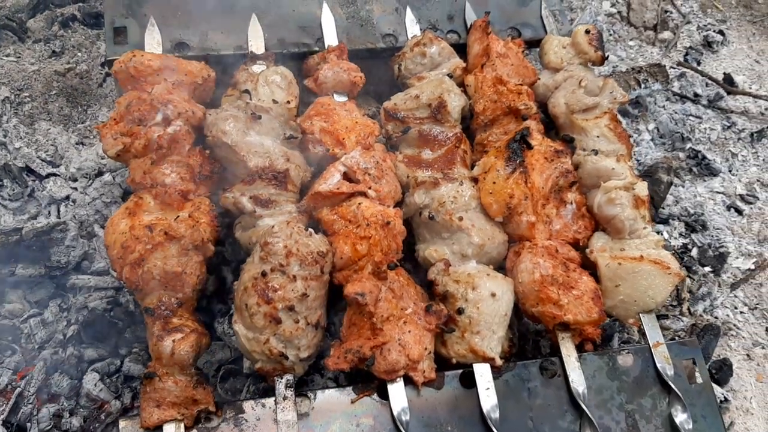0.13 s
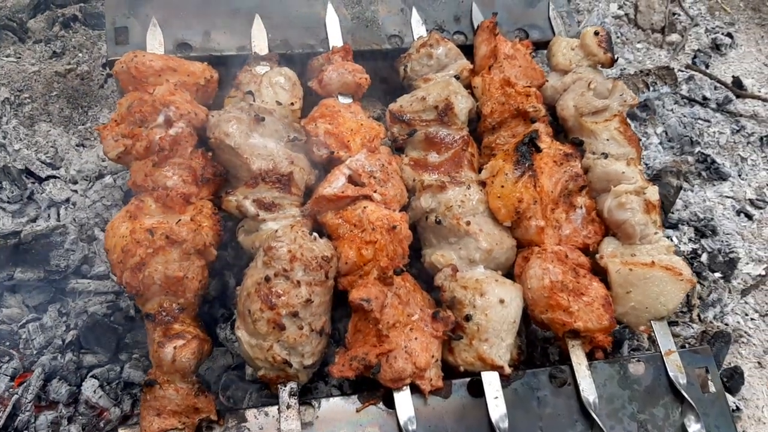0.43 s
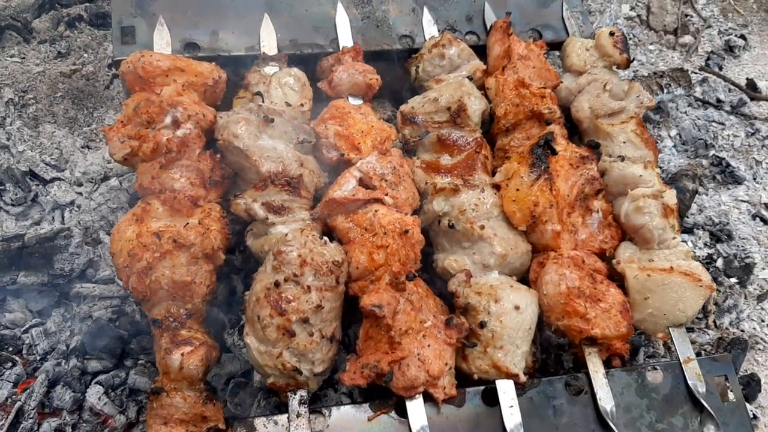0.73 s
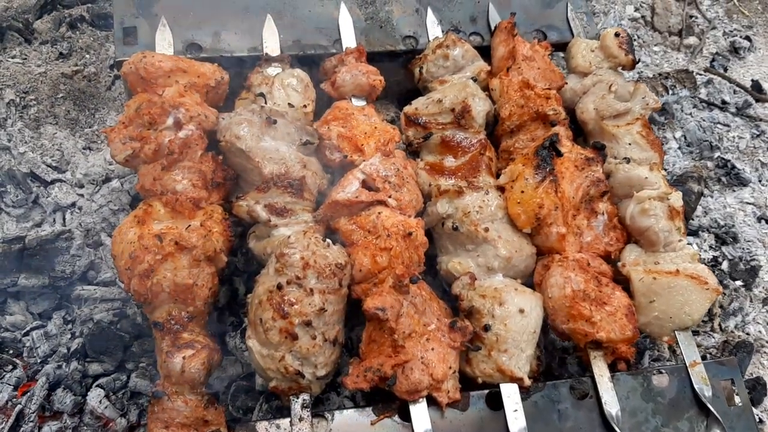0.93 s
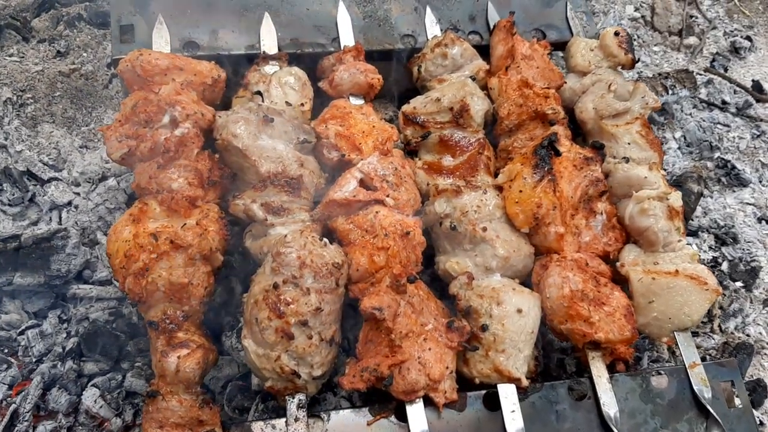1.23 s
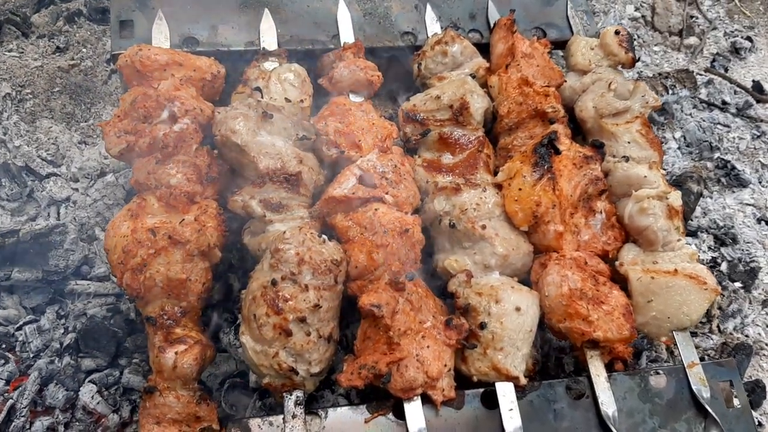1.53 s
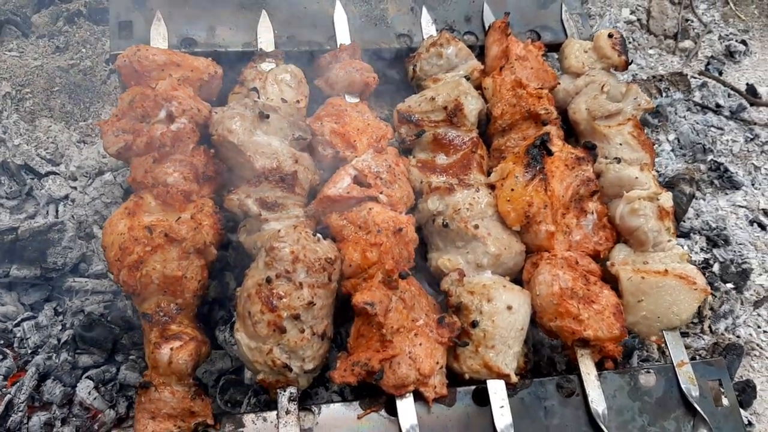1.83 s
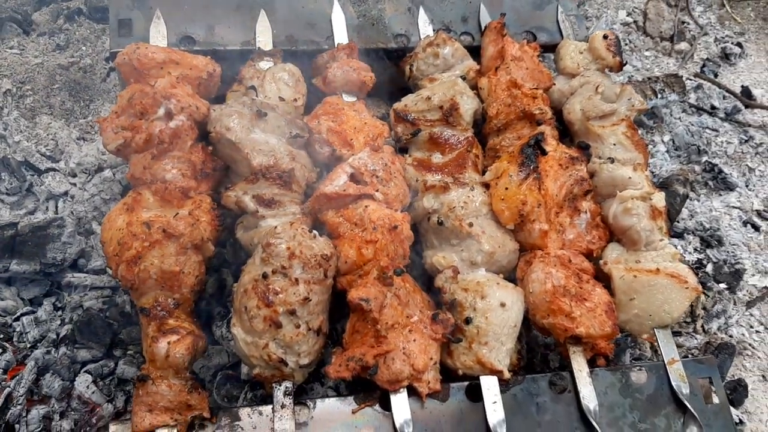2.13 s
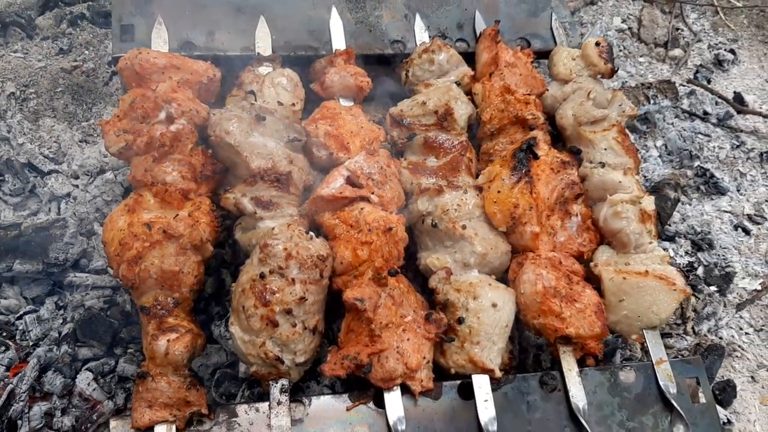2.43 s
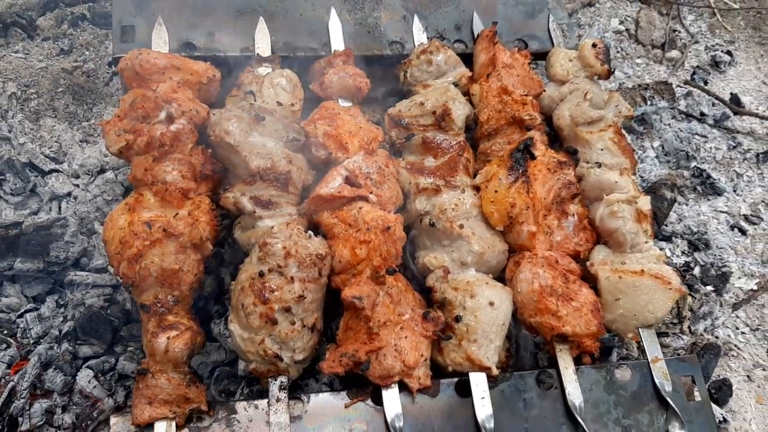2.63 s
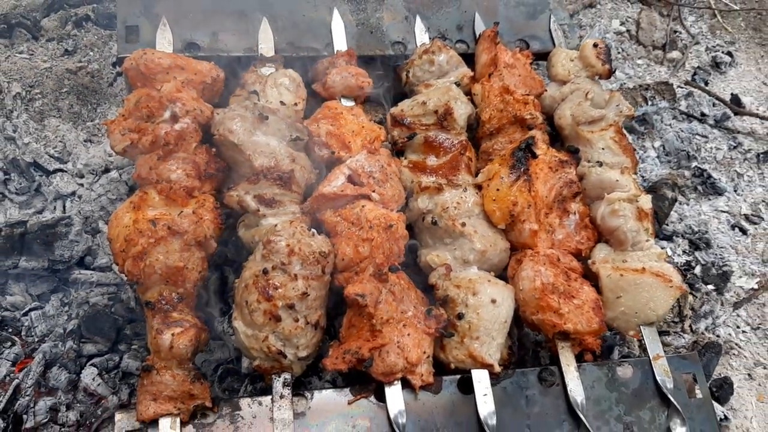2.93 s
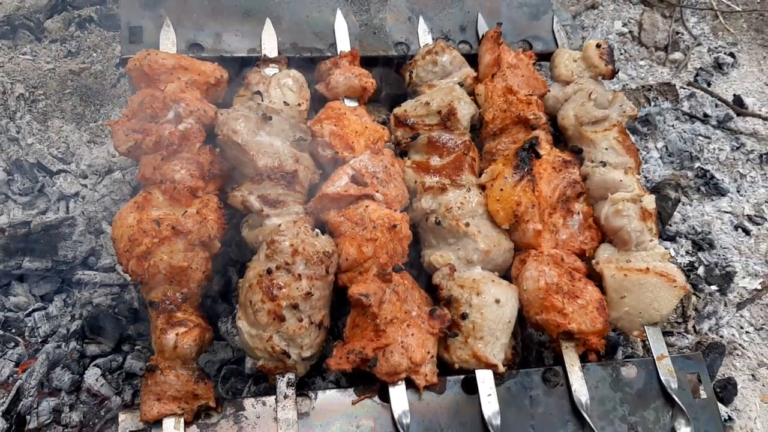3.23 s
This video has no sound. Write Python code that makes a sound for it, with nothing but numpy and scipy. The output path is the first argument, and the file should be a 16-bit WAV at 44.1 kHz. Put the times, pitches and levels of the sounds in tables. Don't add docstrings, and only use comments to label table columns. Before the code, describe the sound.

Crisp, treble-heavy sizzling of meat over coals, heard close outdoors in stereo. It starts softer, turns busy with snapping fat, eases, then surges past two seconds with dripping hisses, a deeper coal crack and scattered pops.

```python
import sys
import numpy as np
from scipy import signal
from scipy.fft import rfft, irfft
from scipy.io import wavfile
from scipy.ndimage import uniform_filter1d

SR = 44100
rng = np.random.default_rng(int(sys.argv[2]) if len(sys.argv) > 2 else 0)


def boost_factor(decibels):
    exponent = np.asarray(decibels, float) / 20
    return 10 ** exponent


def log_audio(samples):
    frames = np.atleast_2d(samples).T
    limited = np.clip(frames, -1, 1)
    pcm = np.round(limited * 32767).astype(np.int16)
    wavfile.write(sys.argv[1], SR, pcm)


N = 149499
SCATTER = .2
HUM_PAN_DB = 3.8


def evened(x):
    return x / np.sqrt(np.mean(x ** 2) + 1e-20)


def passed(x, order, hz, kind="low"):
    return signal.lfilter(*signal.butter(order, hz, kind, fs=SR), x)


def sides(pan_db):
    return boost_factor([[pan_db / 2], [-pan_db / 2]])


def colour(x, points, peaks=()):
    hz = np.abs(np.fft.fftfreq(4096, 1 / SR))
    f, value = np.transpose(points)
    db = np.interp(np.log(hz + 1), np.log(f + 1), value)
    for peak_hz, width_hz, peak_db in peaks:
        db = db + peak_db / (1 + (2 * (hz - peak_hz) / width_hz) ** 2)
    response = np.exp(np.conj(signal.hilbert(db * np.log(10) / 20)))
    taps = np.fft.ifft(response).real[:2048]
    return signal.oaconvolve(x, taps)[:N]


def ports(x, lag_ms, pan_db, echo_ms):
    bounce = boost_factor(-9)
    padded = N + 501
    z, hz = rfft(x, padded), np.fft.rfftfreq(padded, 1 / SR)
    turn = -2j * np.pi * hz / 1000
    left = np.exp(turn * lag_ms) * (1 + bounce * np.exp(turn * echo_ms))
    right = 1 + bounce * np.exp(turn * echo_ms * 1.7)
    return sides(pan_db) * irfft(z * np.array([left, right]), padded)[:, :N]


def scattered(spit, level, lag_ms, pan_db, echo_ms):
    direct = ports(spit, lag_ms, pan_db, echo_ms)
    stray = sides(pan_db) * rng.standard_normal((N, 2)).T * level
    return np.sqrt(1 - SCATTER) * direct + np.sqrt(SCATTER) * stray


def bursts(per_s, spread_db, fade_s, bed):
    size = boost_factor(spread_db * np.minimum(rng.exponential(1, N), 3.8))
    size = size * (rng.random(N) < per_s / SR)
    t = np.arange(800) / SR
    spurt = np.exp(-t / fade_s) * (1 - np.exp(-t / 0.00062))
    return evened(bed + evened(signal.oaconvolve(size, spurt)[:N]))


def crack(fade_s, draw, tick):
    t = np.arange(len(draw)) / SR
    puff = draw * np.exp(-t / fade_s) * (1 - np.exp(-t / .0002))
    return (t == 0) * tick + puff / np.linalg.norm(puff)


def fizz():
    # (time [s], level [dB])
    heat = [(0, -53), (.19, -54.5), (.25, -49), (.45, -51), (.62, -47), (.78, -47.5), (.88, -49),
            (1.08, -52), (1.2, -49.5), (1.5, -49), (1.8, -51), (2.185, -50), (2.215, -45), (2.45, -45),
            (2.62, -49), (3.1, -51), (3.22, -47.5), (3.39, -49)]
    # (left port lag [ms], level before the shift [dB], level after [dB],
    # left-right [dB], bounce off the grill [ms])
    spots = [
        (.395, 0, -7, .9, .6),
        (.385, -7, -5, .8, .33),
        (.37, -12, 0, 1.2, .45),
        (.06, -7, -9, .6, .8),
        (.65, -7, -9, 1.1, .22),
    ]
    shift_s, swell_db = 2.19, 2.5
    t = np.arange(N) / SR
    out, power = np.zeros((2, N)), np.zeros(N)
    shift = np.clip((t - shift_s) / .04, 0, 1)
    for lag_ms, before_db, after_db, pan_db, echo_ms in spots:
        swell = evened(uniform_filter1d(rng.standard_normal(80), 3))
        swell = np.interp(t / t[-1] * 79, np.arange(80), swell)
        gain = boost_factor(before_db + (after_db - before_db) * shift + swell_db * swell)
        fine = rng.standard_normal(N) * bursts(per_s=450, spread_db=3.9, fade_s=.0005, bed=1.05)
        dull = rng.standard_normal(N) * bursts(per_s=130, spread_db=2.8, fade_s=.0007, bed=.3)
        spit = fine + boost_factor(-13) * passed(dull, 2, 5200)
        smear = np.sqrt(abs(uniform_filter1d(spit ** 2, 40)))
        out += gain * scattered(spit, smear, lag_ms, pan_db, echo_ms)
        power += gain ** 2
    return boost_factor(np.interp(t, *np.transpose(heat)) + 2.0) * out / np.sqrt(power)


def snaps():
    # (time [s], peak level [dB], body relative to the top [dB], left-right [dB])
    bubbles = [(0.091, -52, -26, 3.5), (0.2098, -36, -22, 4.5), (0.2338, -40, -22, 2), (0.239, -42, -20, 8),
               (0.2662, -40, -25, 7), (0.353, -26, -27, 8), (0.4099, -23, -24, 2.5), (0.4308, -32, -25, -3),
               (0.4543, -39, -28, 4), (0.5012, -27, -30.5, -3), (0.521, -24, -33, 5),
               (0.553, -27, -20, 3.5), (0.581, -35, -19, -1), (0.6077, -27, -19, 2.5),
               (0.6379, -28, -31, -4), (0.6413, -22, -34, 9), (0.6498, -25, -20, 4.0),
               (0.697, -28, -24, 11), (0.7484, -33, -19, 10), (0.766, -22, -23, 5.0), (0.776, -24, -33, 6),
               (0.83, -28, -19, 8), (0.8664, -33, -14, -3), (0.9047, -37, -19, 8), (0.9304, -40, -21, 3),
               (0.9646, -31, -21, 1), (1.017, -33, -19, 3.0), (1.124, -28, -22, -1),
               (1.3702, -38, -16, 1.5), (1.4796, -31.5, -14, -3), (1.6418, -45, -5, -1),
               (1.7285, -31.5, -20, -2), (1.7408, -26, -17, 1.0), (1.848, -36, -21, 6),
               (1.885, -28, -19, 5), (2.0861, -42, -23, 5.0), (2.128, -41, -23, 2), (2.1878, -31, -16, 3.0),
               (2.217, -26, -26, -1), (2.2731, -26, -23, 1.5), (2.3395, -30, -23, 3), (2.502, -26, -19, 6),
               (2.7088, -35, -15, 0.5), (2.8376, -33, -11, 9), (2.9516, -34, -28, -9),
               (3.0065, -26, -14, 3), (3.1397, -30, -22, 2.0), (3.3128, -44, -27, 0), (3.354, -38, -24, 1)]
    # (frequency [Hz], level [dB])
    snap_tone = [(1000, -14), (3000, -4), (6000, 1.2), (8000, 2.5), (10000, -.5), (16000, .4)]
    split_hz = 12800
    top, body = np.zeros((2, N + 600)), np.zeros((2, N + 600))
    for (s, db, body_db, pan_db), draw in zip(bubbles, rng.standard_normal((len(bubbles), 500))):
        at = round((s + 0.0005) * SR)
        burst = boost_factor(db + 8) * sides(pan_db - 3) * crack(.0008, draw, .7)
        top[:, at:at + 500] += burst
        body[:, at:at + 500] += boost_factor(body_db + 15) * burst
    mix = passed(top, 3, split_hz, "high") + passed(body, 3, split_hz)
    left = ports(mix[0, :N], .395, 0, .6)[0]
    right = ports(mix[1, :N], .395, 0, .6)[1]
    return np.array([colour(left, snap_tone), colour(right, snap_tone)])


def deep_crack():
    # (time [s], level [dB], upper edge [Hz])
    thud = (2.7428, -44, 900)
    # (frequency [Hz], sharpness, level [dB])
    coal_ring = (1850, 31, -10.5)
    s, db, edge_hz = thud
    ring_hz, sharpness, ring_db = coal_ring
    blow = np.arange(N) == round(s * SR)
    ring = signal.lfilter(*signal.iirpeak(ring_hz, sharpness, fs=SR), blow)
    return passed(boost_factor(db + 49) * blow, 2, edge_hz) + boost_factor(db + 63 + ring_db) * ring


def pops():
    # (time [s], peak level [dB])
    cracks = [(0.0283, -37), (0.2343, -42.5), (0.282, -47), (0.3725, -48.5), (0.606, -53), (0.6499, -49),
              (0.6782, -54), (0.6985, -44), (0.7427, -58), (0.839, -40), (0.9534, -43), (1.1827, -54),
              (1.2189, -40.5), (1.276, -39.5), (1.4785, -42.5), (1.5664, -44), (1.5782, -41.5),
              (1.5863, -33.5), (1.5967, -42), (1.7, -48), (1.7295, -43.5), (1.8484, -40), (1.8774, -46.5),
              (1.9846, -44), (2.0417, -45.5), (2.0976, -44), (2.2018, -46), (2.308, -60), (2.5034, -45.5),
              (2.7147, -48), (2.741, -32.5), (2.808, -46), (2.834, -41.5), (2.887, -56), (2.983, -51),
              (3.0096, -48), (3.1667, -47), (3.1668, -42), (3.2144, -35), (3.3543, -47)]
    out = np.zeros(N + 900)
    for (s, db), draw in zip(cracks, rng.standard_normal((len(cracks), 800))):
        at = round((s + 0.00073) * SR)
        out[at:at + 800] += boost_factor(db + 19) * crack(.0011, draw, 1.6)
    dull = passed(out, 2, [1340, 4830], "band")
    mix = (dull + boost_factor(-44) * out)[:N] + deep_crack()
    return ports(mix, 0.38, 0.73, 0.736)


def flares():
    # (start [s], rise [s], fall [s], level [dB], left-right [dB])
    drips = [
        (1.119, 0.069, 0.48, -64.5, -2.5),
        (1.451, 0.03, 0.066, -88.5, -9),
        (2.19, 0.042, 0.23, -63.5, -9),
        (2.27, 0.048, 0.081, -64, -11),
        (2.79, 0.041, 0.031, -65.5, 1.5),
        (3.148, 0.074, 0.051, -59.5, 2),
        (.22, 0.025, 0.55, -72.5, -7),
        (0.599, 0.11, 0.064, -77, -20),
    ]
    # (frequency [Hz], level [dB])
    hiss_tone = [(400, -4.5), (900, 14.5), (2000, 2.5), (4000, 0.5), (8000, 3.5), (12000, -5.5),
                 (16000, 0.5)]
    t, out = np.arange(N) / SR, np.zeros((2, N))
    level = bursts(per_s=450, spread_db=3.2, fade_s=.0011, bed=1.2)
    hiss = scattered(rng.standard_normal(N) * level, level, 0.3306, 0.091, 0.5)
    for start, rise, fall, db, pan_db in drips:
        u = t - start
        shape = np.clip(u / rise, 0, 1) ** 0.89 * np.exp(-np.maximum(u - rise, 0) / fall)
        out += boost_factor(db + 15.5) * sides(pan_db) * shape
    return out * np.array([colour(c, hiss_tone) for c in hiss])


def falling_bubble():
    # (time [s], level [dB], from [Hz], to [Hz], length [s], left-right [dB])
    note = (.5655, -41, 9900, 8300, .004, -7)
    s, db, from_hz, to_hz, length, pan_db = note
    u = np.clip((np.arange(N) / SR - s) / length, 0, 1)
    cycles = length * (from_hz * u + (to_hz - from_hz) * u ** 2 / 2)
    return boost_factor(db) * sides(pan_db) * np.sin(np.pi * u ** 0.44) * np.sin(2 * np.pi * cycles)


def air_puffs():
    # (time [s], level [dB], frequency [Hz])
    air = [
        (2.172, -54, 180),
        (1.72, -64, 110),
        (2.43, -67, 150),
        (2.41, -68, 70),
    ]
    t, out = np.arange(N) / SR, np.zeros((2, N))
    for s, db, hz in air:
        swing = np.exp(-((t - s) * hz / 0.86) ** 2) * np.sin(2 * np.pi * hz * (t - s))
        out += boost_factor(db) * sides(HUM_PAN_DB) * swing
    return out


def hum():
    # (frequency [Hz], level [dB])
    hum_tone = [(12, -36), (24, -19.5), (58, 1.5), (91, 3.5), (301, -7), (472, -12.5), (1010, -14),
                (1400, -30.5), (3300, -120)]
    same = .58
    a, b = rng.standard_normal((N, 2)).T
    other = same * a + np.sqrt(1 - same ** 2) * b
    pair = np.array([colour(a, hum_tone), colour(other, hum_tone)])
    return boost_factor(-75) * sides(HUM_PAN_DB) * evened(pair)


def through_ports(near):
    # (frequency [Hz], level [dB])
    left_curve = [(300, -25), (800, -32.5), (1300, -21), (3000, -16), (7000, -13), (8800, -20.5),
                  (10800, -11), (12000, -0.5)]
    right_curve = [(300, -21), (800, -36), (2000, -40), (3000, -25), (5000, -16.5), (8600, -15.5),
                   (11500, -5.5), (15800, 0)]
    # (frequency [Hz], width [Hz], level [dB])
    left_peaks = [(1482, 310, 8.5), (2014, 280, 10), (2525, 100, 5), (3010, 450, -5.5), (3794, 750, 9),
                  (5630, 1030, 6), (7823, 790, 11.5), (12060, 1900, 1.5), (14200, 810, 2),
                  (15800, 1200, 2.5),
                  (14100, 1500, 0), (2430, 390, -0.4)]
    right_peaks = [(1530, 490, 11), (2070, 510, 4), (2490, 1470, 5.5), (7800, 330, 7), (6100, 1500, 3.5),
                   (11760, 1300, 3.5)]
    left = colour(near[0], left_curve, left_peaks)
    right = colour(near[1], right_curve, right_peaks)
    return boost_factor(7.5) * np.array([left, right])


def scene():
    near = fizz() + snaps() + pops() + flares()
    near = passed(near, 2, 420, "high")
    return through_ports(near) + falling_bubble() + air_puffs() + hum()


def top_cut(x):
    return signal.sosfilt(signal.butter(12, 15930, fs=SR, output="sos"), x)


def record(dry):
    trimmed = passed(dry, 2, 24, "high")
    band_limit = signal.firwin(511, 15760, window=("kaiser", 9), fs=SR)
    mix = signal.oaconvolve(trimmed, band_limit[None], "same")
    return top_cut(mix)


dry = scene()
out = record(dry)
log_audio(out)
```